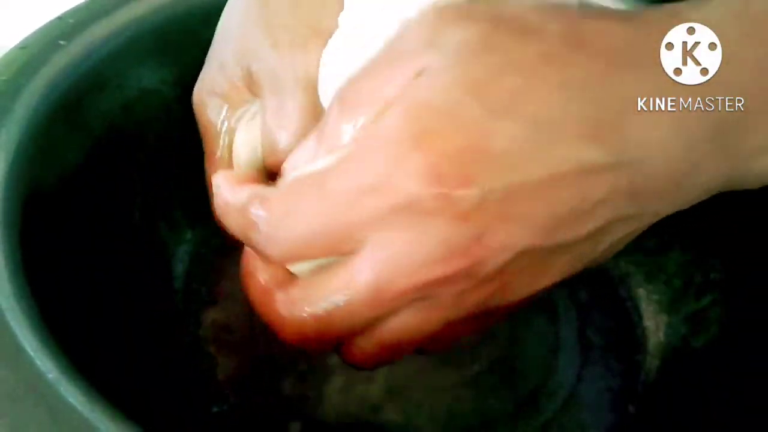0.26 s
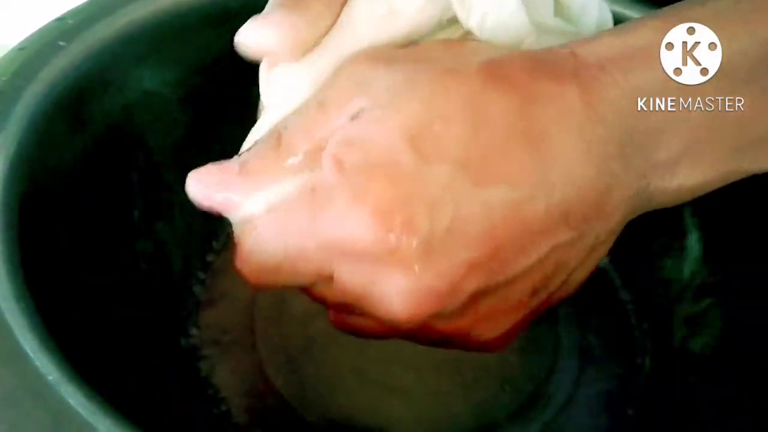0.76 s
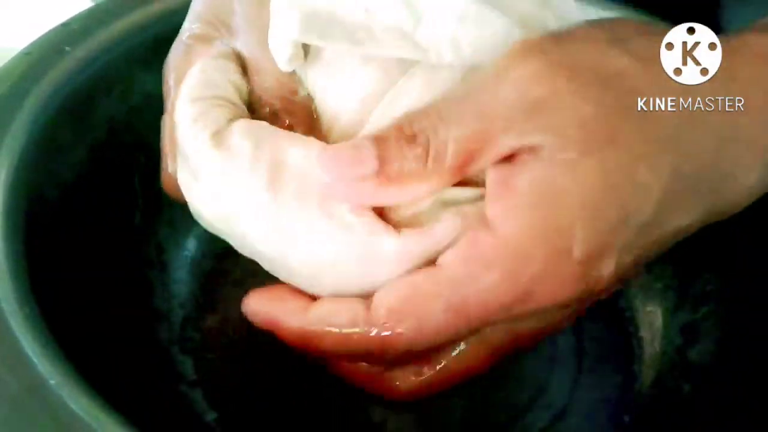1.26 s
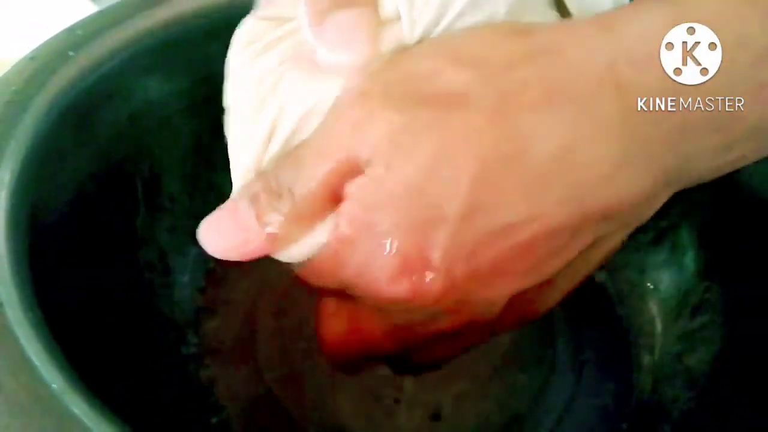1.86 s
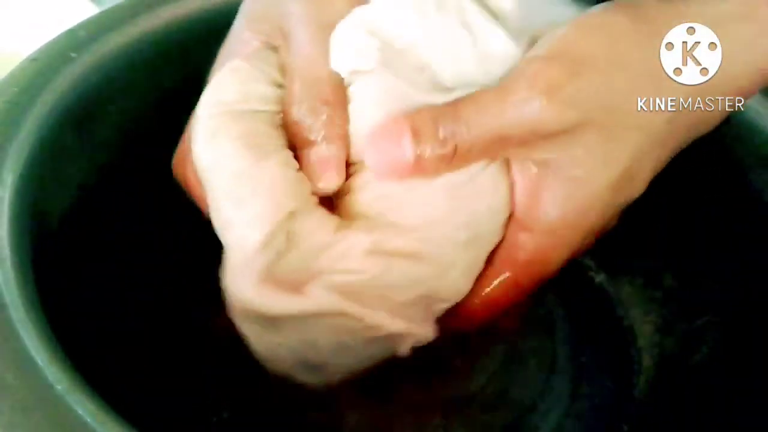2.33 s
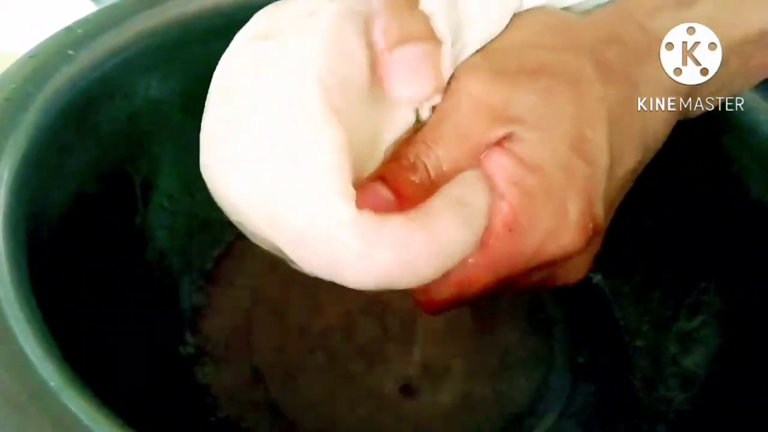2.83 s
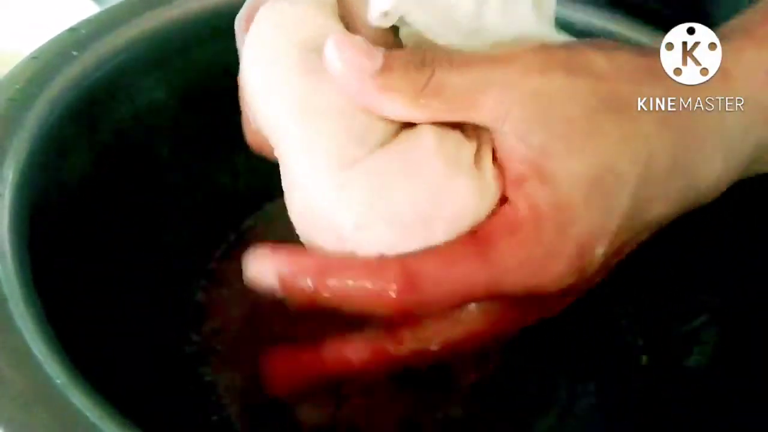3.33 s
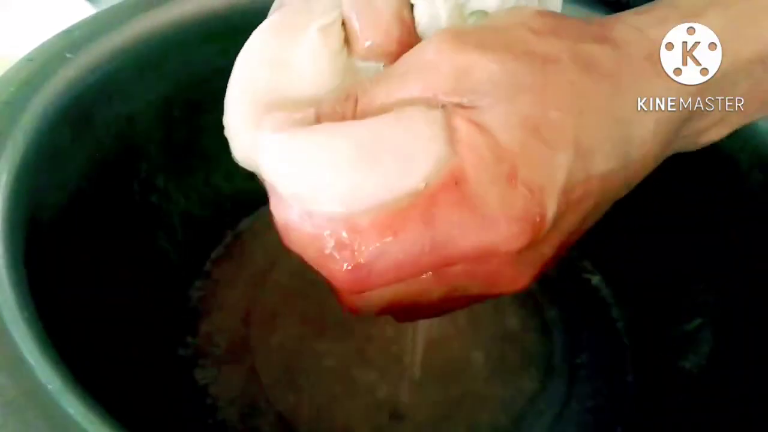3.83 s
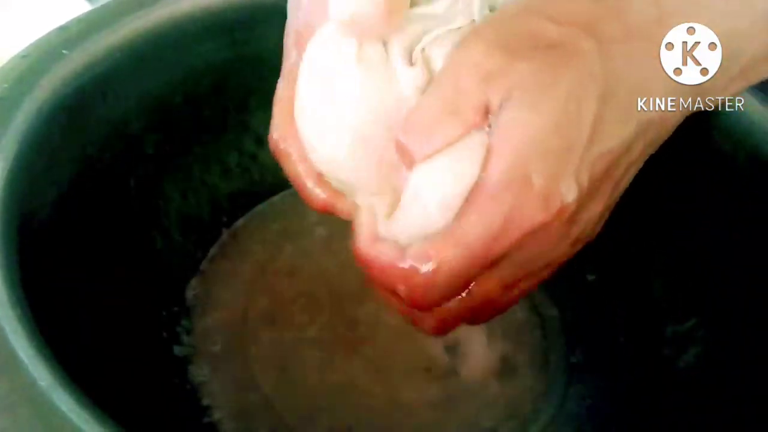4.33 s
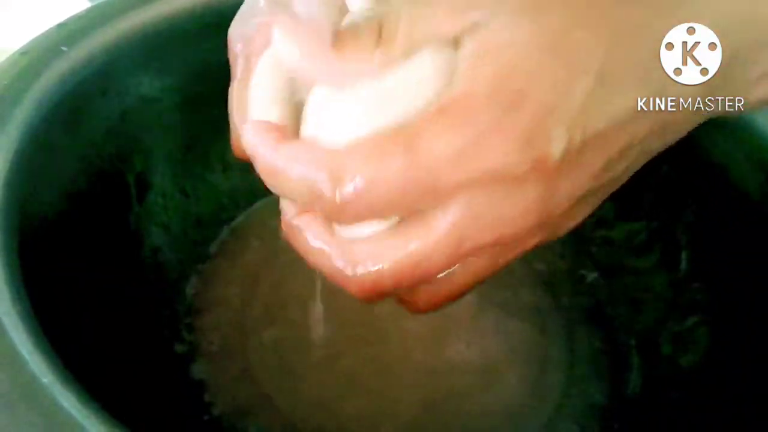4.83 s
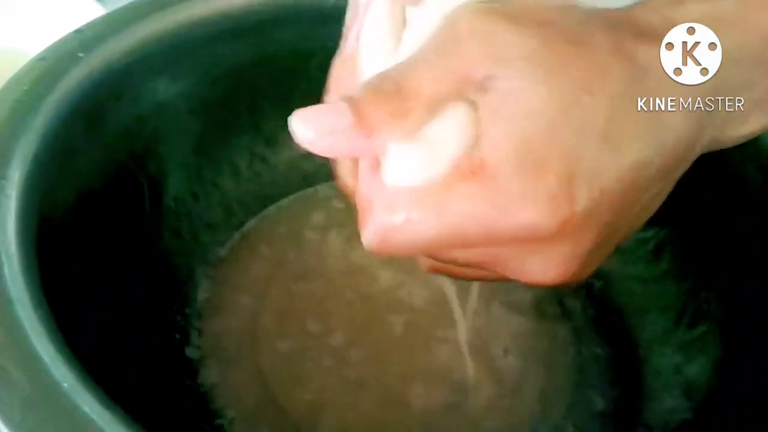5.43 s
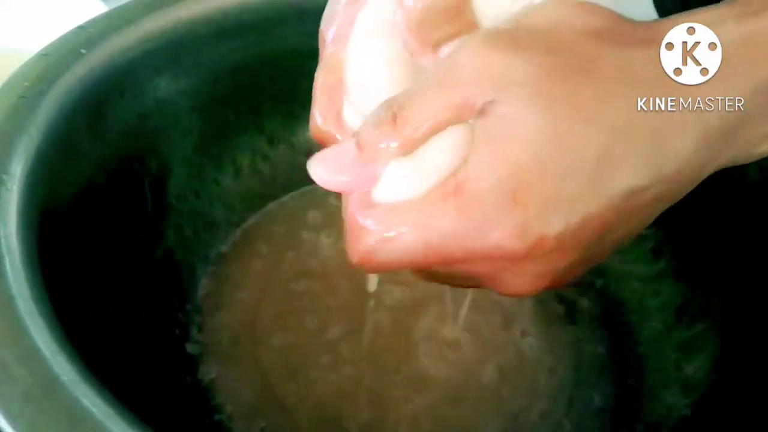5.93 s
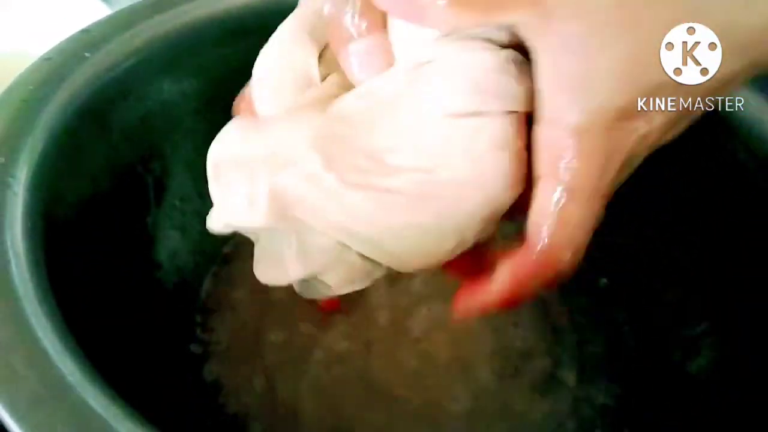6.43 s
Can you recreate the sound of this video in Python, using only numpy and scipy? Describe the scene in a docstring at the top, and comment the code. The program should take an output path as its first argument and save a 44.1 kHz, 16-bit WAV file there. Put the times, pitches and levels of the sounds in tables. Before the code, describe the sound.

Close to a phone microphone in a quiet kitchen, hands wring wet pulp in a cloth over a metal pot. Juice squelches through the weave in irregular gushes, with sharp wet splats and frothy seeping between. The strongest spurt comes just after the middle, with tiny airy whistles. Drops plop and tick into the liquid, echoing briefly in the pot, and soft low thuds mark the pressing arms.

```python
"""Juice and air squelch through the weave as hands wring pulp in a cloth over a metal pot, close to a phone.
Gushes and seeping are clumped noise and rains of damped sines, from big gurgles to fine spray; splats are bursts of noise.
Drops plop and tick as damped sines, with a short echo of the plops in the pot; pot and table thud softly.
A wet finger squeaks and the pot hums as wavering sines; pockets of air hiss and tiny whistles chirp.
Behind it lies the low noise of a quiet kitchen; the phone thins the bass and suppresses steady sound."""
import sys
import numpy as np
from scipy import signal
from scipy.fft import rfft, irfft, next_fast_len
from scipy.io import wavfile
from scipy.ndimage import uniform_filter1d, map_coordinates

SR = 44100
rng = np.random.default_rng(int(sys.argv[2]) if len(sys.argv) > 2 else 0)


def log_audio(samples):
    """Write samples as a 16-bit WAV file to the path given in sys.argv[1]."""
    # one column per channel
    frames = np.atleast_2d(samples).T
    # limit to full scale, then quantise
    limited = np.clip(frames, -1, 1)
    pcm = np.round(limited * 32767).astype(np.int16)
    wavfile.write(sys.argv[1], SR, pcm)


N = 294588

# bubble sizes (big, large, medium, small, fine): (low edge [Hz], high edge [Hz], burstiness [dB],
# burst rate [knots/s], bubbles [per s], ringing [cycles until 50 dB down], bubble share of the power [0-1])
BUBBLE_SIZES = [(265.8, 787, 4, 45, 160, 16, 0.37), (800, 1850, 2, 120, 400, 42, 0.55),
                (1864, 3872, -1, 300, 900, 35, 0.57), (4185, 9520, 3, 360, 1700, 40, 0.55),
                (9300, 15400, 4.5, 600, 1700, 36, 0.2)]
# colour of pot mouth and microphone: (frequency [Hz], level [dB])
POT_MOUTH = [(250, -36), (450, -30), (694, -23.5), (868, -15), (1430, -1), (1890, -3.5), (2720, 6),
             (4410, -2.5), (7160, 3), (8970, -8), (11000, -14), (13100, -9.5), (14800, -3), (15600, 3)]


def amp(db):
    """Amplitude of a level in dB."""
    return 10 ** (np.asarray(db) / 20)


def unit(x):
    """x scaled to an rms of 1."""
    return x / np.sqrt(np.mean(x ** 2) + 1e-20)


def peak(x, db):
    """x scaled so that its highest peak is db."""
    return amp(db) * x / np.max(np.abs(x))


def curves(rows):
    """One value per sample for each column after the time."""
    s, *cols = np.transpose(rows)
    return [np.interp(np.arange(N) / SR, s, c) for c in cols]


def wobble(rate):
    """A smooth random curve, rate knots a second."""
    knots = rng.standard_normal(int(N * rate / SR) + 4)
    return map_coordinates(knots, [np.arange(N) * rate / SR])


def coloured(x, points):
    """x through the (Hz, dB) points, no lower than -70 dB, as a causal filter from the folded cepstrum."""
    f, db = np.transpose(points)
    hz = np.fft.rfftfreq(4096, 1 / SR)
    response_db = np.maximum(np.interp(np.log(hz + 1), np.log(f + 1), db), -70)
    cepstrum = irfft(np.log(amp(response_db)))
    cepstrum[1:2048] *= 2
    cepstrum[2049:] = 0
    return signal.fftconvolve(x, irfft(np.exp(rfft(cepstrum))), axes=-1)[..., :N]


def add(track, s, sound):
    """Adds a sound into the track at second s."""
    part = track[max(round(s * SR), 0):][:len(sound)]
    part += sound[:len(part)]


def tone(rows, rough_db, rate, waver=.029):
    """An unsteady sine along (s, Hz, rms dB) rows, faded at both ends."""
    hz, db = curves(rows)
    t, start, end = np.arange(N) / SR, rows[0][0], rows[-1][0]
    fade = np.clip(np.minimum(t - start, end - t) / 0.0037, 0, 1)
    level = np.sqrt(2) * amp(db + rough_db * wobble(rate))
    turns = np.cumsum(hz * (1 + waver * wobble(rate))) / SR
    return fade * level * np.sin(2 * np.pi * turns)


def crackle(per_s):
    """Films of juice snap at random: a sudden jump in level that dies in a few milliseconds."""
    snaps = (rng.random(N) < per_s / SR) * amp(5.0 * rng.random(N))
    decay = amp(-60 * np.arange(SR // 40) / SR / 0.021)
    return 1 + .5 * signal.fftconvolve(snaps, decay)[:N]


def bubbles(lo_hz, hi_hz, per_s, cycles):
    """A random rain of damped sines; for a moment a few pores keep blowing bubbles of their own size."""
    when, pick, scatter, loud = rng.random((4, int(per_s * N / SR)))
    pores = rng.random((int(N / SR / .16) + 2, 6))  # six pores, new ones about every 0.16 s
    group = (when * (len(pores) - 1) + pick).astype(int)  # neighbouring groups overlap
    size = pores[group, (scatter * 6).astype(int)]
    hz = (lo_hz * (hi_hz / lo_hz) ** size * (1 + .03 * (pick - .5)))[:, None]
    k = np.arange(int(SR * cycles / lo_hz / 2))
    turn = hz * k / SR
    envelope = amp(10.0 * loud[:, None] - 50 * turn / cycles) * (1 - np.exp(-turn / 3.4))
    wave = envelope * np.sin(2 * np.pi * turn)
    place = (when * N).astype(int)[:, None] + k
    return unit(np.bincount(place.ravel(), wave.ravel(), N)[:N])


def flow_db():
    """Level of each bubble size: gushes swell and ebb in power on top of the seeping."""
    # juice seeping from the cloth: (time [s], level of the froth [dB], level of the gurgle [dB])
    seep = [(0, -51.5, -65), (.25, -56, -60.5), (.6, -49, -60), (.92, -64, -62), (1.0, -50.5, -60.5),
            (1.3, -47, -52.5), (1.95, -47, -56.5), (2.42, -53, -59.5), (2.9, -48.5, -60), (3.1, -48.5, -65),
            (3.8, -41, -47.5), (4.04, -53.5, -64), (4.3, -48, -55.5), (4.56, -50, -55.5),
            (5.05, -44.5, -54.5), (5.28, -53.5, -59), (5.75, -49.5, -58), (6.22, -49.5, -55.5),
            (6.68, -49, -54.5)]
    # each bubble size against its seeping level: (level [dB]), big to fine
    seep_sizes_db = (-16, 3, 0, -2, -6)
    # gushes as the grip tightens: (peak time [s], rise [s], fall [s], level of medium bubbles [dB],
    # big, large, small and fine bubbles against it [dB])
    gushes = [(.2, 0.19, 0.32, -57, -27, -24, 8.5, 3), (0.371, 0.06, 0.11, -34, -35, -6, 3.5, -5),
              (.62, 0.3, 0.31, -51.5, -28, -24, 4, -8), (1.1, 0.28, 0.35, -48.5, -26, 1, 4, 0),
              (1.471, 0.18, 0.071, -44.5, -28, -10, 5.5, 5.5), (1.51, 0.021, 0.087, -60, 10.5, 5, -2, 1),
              (1.629, 0.077, 0.068, -35.5, -25.5, -14, 0.5, -6.5),
              (1.931, 0.052, 0.14, -39, -6, -3, -2.5, -2), (2.11, 0.11, 0.23, -42.5, -41, -0.5, 1.5, -4),
              (2.19, 0.12, 0.072, -44, -44, -22, 3.5, 1), (2.385, 0.013, 0.24, -43, -37, -35, -6, -2.5),
              (2.504, 0.15, 0.068, -34.5, -57, -45, -1.5, -10),
              (2.67, 0.25, 0.084, -45.5, -44, -2.5, -7, -8), (2.96, 0.027, 0.13, -56, 8, 10, -7, -14),
              (3.004, 0.055, 0.22, -30, -27, -4.5, -1, -6), (3.24, 0.27, 0.27, -41.5, -7.5, -1.5, 0.5, -3),
              (3.431, 0.11, 0.18, -50.5, -15, -23, -31, 6.5),
              (3.581, 0.088, 0.17, -27, -15.5, -4, -2.5, -6.5),
              (3.72, 0.21, 0.097, -42, -2.5, 4.5, -17, -17),
              (3.95, 0.064, 0.072, -53.5, -39, -29, 14.5, -13),
              (4.02, 0.012, 0.22, -51.5, -27, -22, 2.5, 5.5),
              (4.449, 0.065, 0.065, -46, -4.5, -2.5, 5.5, -1),
              (4.61, 0.052, 0.14, -40.5, -44, -39, -1, -10), (4.828, 0.083, 0.055, -37, -32, -8, -10, -9.5),
              (4.91, 0.05, 0.15, -37.5, -55, -8.5, 2, 3.5), (4.98, 0.19, 0.16, -41, -51, -20, 8.5, -15),
              (5.391, 0.19, 0.42, -48.5, -13.5, -0.5, 0, -12),
              (5.68, 0.03, 0.51, -44.5, -26, -5.5, -0.5, -1.5), (6.11, 0.097, 0.16, -57.5, 5, 6, 8, -20),
              (6.291, 0.018, 0.23, -41.5, -18, -2.5, -3, -6), (6.67, 0.032, .1, -49, 10.5, 1, -13, -18)]
    edge_db, roundness = 22.5, 1.414  # a gush is this much down one rise or fall from its peak; shape of its top
    froth, gurgle = curves(seep)
    seep_db = np.array([gurgle, gurgle, froth, froth, froth]) + np.c_[list(seep_sizes_db)]
    power, t = amp(seep_db) ** 2, np.arange(N) / SR
    for s, rise, fall, db, big, large, small, fine in gushes:
        near = slice(max(round((s - 3 * rise) * SR), 0), round((s + 3 * fall) * SR))
        away = np.maximum((s - t[near]) / max(rise, .01), (t[near] - s) / max(fall, .01))
        swell = amp(db - edge_db * away ** roundness)
        power[:, near] += (amp(np.c_[[big, large, 0, small, fine]]) * swell) ** 2
    return 10 * np.log10(power)


def splat_levels():
    """Each splat throws bubbles of all but the biggest size at once; its level jumps and dies."""
    # splats: (time [s], nominal peak of medium bubbles [dB],
    # large, small and fine bubbles against it [dB], t60 [s])
    splats = [(0.566, -37.5, -53.5, 3.5, -12, 0.08), (0.94, -41, -36, 7, 7, 0.092),
              (0.97, -20, -37, -5, -23, 0.04), (1.029, -23, 5.5, -8, -38, 0.039),
              (1.358, -39.5, -24, 14.5, -4, 0.09), (1.43, -25.5, -26, -1, -12, 0.054),
              (1.693, -25, -16, 4.5, 4.5, 0.023), (1.755, -20, -15, -27, -17, 0.058),
              (1.783, -42.5, -20, 20, -3, 0.036), (1.819, -33.5, -6, 19, -5, 0.071),
              (1.873, -13, -11, -4, -9.5, 0.056), (1.957, -22.5, -5, -7, -30, 0.051),
              (2.758, -37.5, -29, 4, 13.5, 0.14), (2.784, -32.5, -35, 23.5, 14, 0.019),
              (3.5554, -27, -19, -16, -21, 0.021), (3.707, -26, -27, 2.5, -23, 0.13),
              (4.135, -24, -10, -8, -33, 0.043), (4.173, -32, -2.5, 5, -15, 0.043),
              (4.29, -30.5, 2.5, 4.5, -27, 0.043), (4.354, -23.5, -26, -13, -21, 0.097),
              (4.373, -20.5, -9.5, 6.5, 4, 0.055), (4.4294, -29, -10, -7, -16, 0.11),
              (4.595, -39, -17, 13, -12, 0.031), (5.169, -20, -12, -1, -2, 0.045),
              (5.401, -19, -10.5, -17, -56, 0.074), (5.573, -29, -0.5, -8, -30, 0.077),
              (5.652, -17, -4.5, -15, -35, 0.041), (6.258, -48.5, -38, 21.5, 11, 0.14),
              (6.271, -27.5, -47, -1.5, -9, 0.1), (6.594, -29.5, -36, -2, -35, 0.034)]
    crest_db = 5  # a splat's nominal peak over its rms level
    level, t = np.zeros((len(BUBBLE_SIZES), N)), np.arange(SR // 5) / SR
    for s, db, large, small, fine, t60 in splats:
        shape = amp(db - crest_db - 60 * t / max(t60, .005)) * (1 - np.exp(-t / 0.0029))
        for row, rel_db in zip(level[1:], (large, 0, small, fine)):
            add(row, s, amp(rel_db) * shape)
    return level


def squelch():
    """Bubbles and hiss come in clumps: part of the clumping is common to all sizes, part is each size's own."""
    out, snaps = np.zeros(N), crackle(per_s=27)
    common_db = 1.0 * wobble(35) + 0.89 * wobble(180)
    for size, db, splat in zip(BUBBLE_SIZES, flow_db(), splat_levels()):
        lo_hz, hi_hz, burst_db, rate, per_s, cycles, share = size
        edges = signal.butter(4, [lo_hz, hi_hz], "band", fs=SR, output="sos")

        def shape(x):
            """x in this size's band, as it leaves the pot mouth."""
            return coloured(signal.sosfilt(edges, x), POT_MOUTH)

        hiss, froth = rng.standard_normal(N), bubbles(lo_hz, hi_hz, per_s, cycles)
        clumps = unit(snaps * amp(common_db + burst_db * wobble(rate)))
        out += np.sqrt(share) * shape(froth * amp(db - 1.5 + common_db)) / np.std(shape(froth))
        hiss_level = np.sqrt(1 - share) * amp(db - 1.0) * clumps
        splat_level = splat * clumps ** 0.55  # splats clump less
        out += shape(hiss * (hiss_level + splat_level)) / np.std(shape(hiss))
    return out


def patter():
    """Stray droplets ring as small damped sines, their level following the flow of small bubbles."""
    drops = bubbles(3300, 11000, per_s=60, cycles=22) * amp(4 * wobble(60))
    return amp(flow_db()[3] - 8) * unit(coloured(drops, POT_MOUTH))


def kitchen():
    """The quiet room: noise, strongest in the bass, whose level drifts slightly."""
    # colour of the room noise, floored at -70 dB by the filter: (frequency [Hz], level [dB])
    room = [(15, -28), (25, -1), (49, -14), (87, -6.5), (144, -8), (517, -12), (618, -8), (760, -25.5),
            (1200, -24), (2640, -120)]
    level = amp(-73.5 + 0.61 * wobble(2.58))  # dB rms
    return level * unit(coloured(rng.standard_normal(N), room))


def thuds():
    """A soft push on a heavy body: a low ring that breaks up into the uneven beats of many close modes."""
    # pot and table as the arms press: (time [s], peak [dB], pitch [Hz], t60 of the whole thud [s])
    pushes = [(0.26, -45, 177.6, 0.6), (1.07, -43.5, 191, 0.99), (4.027, -48.5, 173, 0.99),
              (4.59, -46.5, 97.6, 0.39), (5.289, -48.5, 127.4, 0.6), (5.516, -40, 101, 0.35),
              (6.254, -54, 94, 0.51), (6.445, -40.5, 99, 0.75), (6.62, -48.5, 122, 0.32)]
    out, t = np.zeros(N), np.arange(SR // 2) / SR
    for s, db, hz, t60 in pushes:
        near = hz * np.exp(0.13 * rng.standard_normal((24, 1)))
        start = 2 * np.pi * rng.random((24, 1))
        beats = np.sum(np.sin(2 * np.pi * near * t + start), 0) / np.sqrt(len(near))
        ring = amp(-60 * t / 0.068) * np.sin(2 * np.pi * hz * t) + 0.13 * beats
        envelope = amp(-60 * t / max(t60, .02)) * (1 - np.exp(-t / 0.0079)) ** 2
        add(out, s, peak(envelope * ring, db))
    return out


def plops():
    """A trapped bubble rings, rising a little in pitch as it nears the surface; near sizes ring with it."""
    # drops that trap one bubble: (time [s], peak [dB], starting pitch [Hz], t60, held to 0.005 or more [s])
    drops = [(0.635, -44.5, 1330, 0.11), (0.795, -32, 1353, 0.12), (0.798, -38, 4500, 0.024),
             (0.978, -20, 3130, 0.015), (0.988, -34.5, 1543, 0.2), (.998, -21, 3130, 0.017),
             (1.0363, -17, 2140, 0.014), (1.045, -23, 2170, 0.013), (1.476, -31, 3400, 0.11),
             (3.1, -24, 3030, 0.023), (6.668, -32, 990, 0.046), (1.187, -31, 1230, 0.018),
             (1.233, -44.5, 684, 0.093), (1.037, -17, 2850, 0.014), (1.893, -28.5, 1360, 0.029),
             (1.894, -30, 980, 0.019), (1.878, -16, 3460, .025), (1.879, -16.5, 7370, 0.015),
             (1.941, -38, 854, 0.063), (1.951, -25, 1380, 0.013), (1.962, -25, 1190, 0.013),
             (4.31, -32, 2810, 0.017), (5.079, -31, 2980, 0.051), (6.276, -22, 2744, 0.068),
             (6.277, -18, 3400, 0.03), (6.379, -28.5, 5290, 0.029), (2.949, -43.5, 577, 0.16),
             (3.135, -31, 925, 0.04), (3.364, -41, 407, 0.02), (3.564, -20, 2855, 0.065),
             (3.588, -23, 2920, 0.027), (3.654, -17.5, 2670, 0.021), (4.29, -32, 990, 0.0039),
             (4.288, -40.5, 420, 0.043), (4.428, -40, 954, 0.047), (1.945, -39, 600, 0.042),
             (5.306, -38.5, 1650, 0.12), (5.42, -37.5, 803, 0.099), (5.576, -45, 370, 0.089),
             (5.652, -40, 794, 0.21), (5.951, -23.5, 2470, 0.014), (6.074, -28.5, 1660, 0.058),
             (6.08, -28.5, 960, 0.05), (6.089, -22, 1710, .02), (6.084, -43.5, 316, 0.054),
             (6.365, -28.5, 1236, 0.12), (5.824, -27.5, 7050, 0.03), (6.021, -32.5, 7240, 0.037),
             (6.061, -28, 5860, 0.041)]
    out, t = np.zeros(N), np.arange(SR // 6) / SR
    for s, db, hz, t60 in drops:
        near = hz * np.exp(0.0964 * rng.standard_normal((3, 1)))
        neighbours = np.sum(np.sin(2 * np.pi * near * t), 0)
        ring = np.sin(2 * np.pi * hz * (t + 0.2 * t ** 2)) + 0.41 * neighbours
        envelope = amp(-60 * t / max(t60, .005)) * (1 - np.exp(-t * hz / 2.6))
        add(out, s, peak(envelope * ring, db))
    return out


def pot(x):
    """The short echo inside the pot: x smeared by decaying noise."""
    t = np.arange(SR // 5) / SR
    echo = unit(rng.standard_normal(len(t)) * amp(-60 * t / 0.36)) / np.sqrt(len(t))
    return signal.fftconvolve(x, echo)[:N]


def squishes():
    """Air squeezed from pockets in the cloth: noise a few hundred hertz wide, sliding and spitting unevenly."""
    # one table a pocket: (time [s], pitch [Hz], level before the spitting [dB])
    pockets = [
        [(.982, 3100, -33), (1.035, 2400, -32)],
        [(2.465, 1750, -41.5), (2.57, 1166, -52)],
        [(2.455, 2876, -28), (2.49, 2530, -24.5), (2.54, 2530, -38)],
        [(4.91, 7420, -31.5), (4.98, 6790, -26), (5.01, 6800, -27.5)],
    ]
    return sum(tone(rows, rough_db=-2.5, rate=120) for rows in pockets) * wobble(900)


def squeaks():
    """A wet finger slips: a wavering sine that falls in pitch."""
    # one table a slip: (time [s], pitch [Hz], level [dB])
    slips = [
        [(1.055, 1686, -48), (1.11, 1546, -40), (1.18, 1435, -44)],
        [(4.755, 1697, -53), (4.8, 1510, -44)],
    ]
    return sum(tone(rows, rough_db=2, rate=160, waver=.012) for rows in slips)


def ticks():
    """Droplets and snapping films tick once: a few cycles with a crack of noise on top."""
    # (time [s], peak before the bass is cut [dB], pitch [Hz])
    snaps = [(1.344, -24.5, 3900), (1.3638, -17, 7100), (1.37, -17, 7200), (1.378, -32, 7050),
             (1.6935, -27, 3260), (1.726, -25, 6000), (1.739, -26, 6550), (1.947, -21, 4500),
             (2.427, -21, 6500), (2.445, -34, 5900), (2.876, -27, 5450), (4.295, -22, 3040),
             (5.139, -30, 6400), (5.153, -24, 6400), (5.4036, -12, 2900), (5.4073, -19, 3220),
             (5.6543, -16.5, 2710), (5.8365, -25, 2800), (5.872, -31, 5000), (6.399, -27, 4000)]
    cycles = 6.3  # until 60 dB down
    out, t = np.zeros(N), np.arange(SR // 100) / SR
    for s, db, hz in snaps:
        ring = np.sin(2 * np.pi * hz * t) + 0.17 * rng.standard_normal(len(t))
        envelope = amp(-60 * t * hz / cycles) * (1 - np.exp(-t * hz))
        add(out, s, peak(envelope * ring, db))
    return signal.sosfilt(signal.butter(2, 1500, "high", fs=SR, output="sos"), out)


def hums():
    """The pot hums under the trickle: wavering sines that swell unevenly."""
    # one table a hum: (time [s], pitch [Hz], level before the swelling [dB])
    notes = [
        [(4.08, 646, -64.5), (4.25, 635, -64)],
        [(1.75, 657, -65), (1.84, 630, -56)],
        [(4.06, 176, -73), (4.24, 194, -54.5), (4.4, 184.5, -66.5)],
        [(1.73, 470, -58), (1.84, 452, -52), (1.93, 385, -66)],
        [(5.54, 815, -52.5), (5.68, 797, -56), (5.8, 809, -66), (5.9, 818, -56), (6.07, 800, -64)],
        [(6.4, 824, -50), (6.62, 910, -80)],
    ]
    return sum(tone(rows, rough_db=0.0, rate=70, waver=.015) * (.6 + wobble(130)) for rows in notes)


def chirps():
    """Air whistles through the tight weave: each starts at 15.4 kHz and drops as the pore widens."""
    # (time [s], peak before the high-pass [dB], t60 [s])
    whistles = [(3.641, -13, 0.013), (3.695, -17.5, 0.024), (3.7144, -20, 0.017), (3.722, -14, 0.041),
                (3.816, -17, 0.029), (3.834, -17, 0.029), (3.8476, -22, 0.017), (3.857, -20, 0.024),
                (5.382, -27.5, 0.032)]
    out, t = np.zeros(N), np.arange(SR // 30) / SR
    for s, db, t60 in whistles:
        hz = 15400 - 2800 * rng.uniform(0.079, 1) * (1 - np.exp(-t / 0.008))
        flutter = 1 + .9 * uniform_filter1d(rng.standard_normal(len(t)), size=16) * 4
        envelope = amp(-60 * t / max(t60, .005)) * (1 - np.exp(-t / 0.00059))
        whistle = np.sin(2 * np.pi * np.cumsum(hz) / SR)
        add(out, s, peak(envelope * flutter * whistle, db))
    return signal.sosfilt(signal.butter(4, 11000, "high", fs=SR, output="sos"), out)


def scene():
    """Everything that reaches the phone, on one channel."""
    drops = plops()
    cloth = squelch() + patter() + squishes() + ticks() + chirps()
    vessel = thuds() + amp(-11) * pot(drops) + hums()
    return (cloth + drops + vessel + squeaks() + kitchen())[None]


def suppress(x):
    """The phone's noise suppressor turns down each voice-band bin while it is near or below its usual level."""
    hz, _, z = signal.stft(x, SR, nperseg=1024, noverlap=768)
    power = np.abs(uniform_filter1d(np.abs(z) ** 2, size=7, axis=-1)) + 1e-20
    usual = np.quantile(power, .25, axis=-1, keepdims=True)
    gain = np.clip(1 - 0.64 * usual / power, amp(-14.0), 1)
    voice = ((hz > 250) & (hz < 2100))[:, None]
    gain = np.where(voice, gain, 1)
    return signal.istft(z * gain, SR, nperseg=1024, noverlap=768)[1][..., :N]


def record(dry):
    """The phone drops the deepest bass, suppresses noise and keeps nothing above its band limit."""
    top_hz = 15500
    thin = signal.sosfilt(signal.butter(2, 45, "high", fs=SR, output="sos"), dry)
    m = next_fast_len(N + SR // 2)
    spectrum = rfft(suppress(thin), m)
    return irfft(spectrum * (np.fft.rfftfreq(m, 1 / SR) < top_hz), m)[..., :N]


dry = scene()
out = record(dry)
log_audio(out)
```